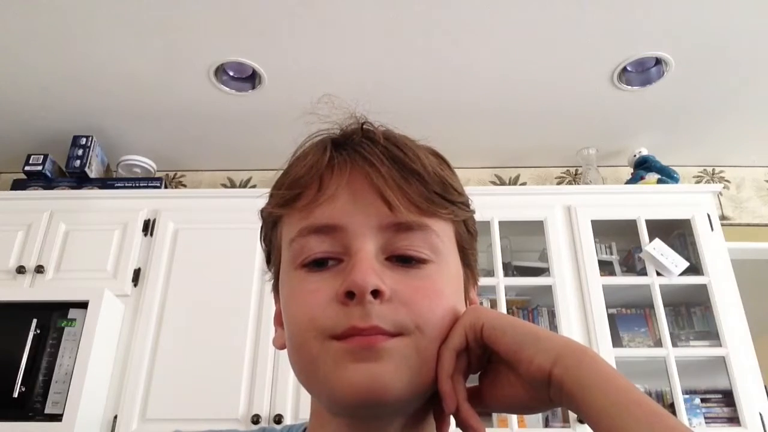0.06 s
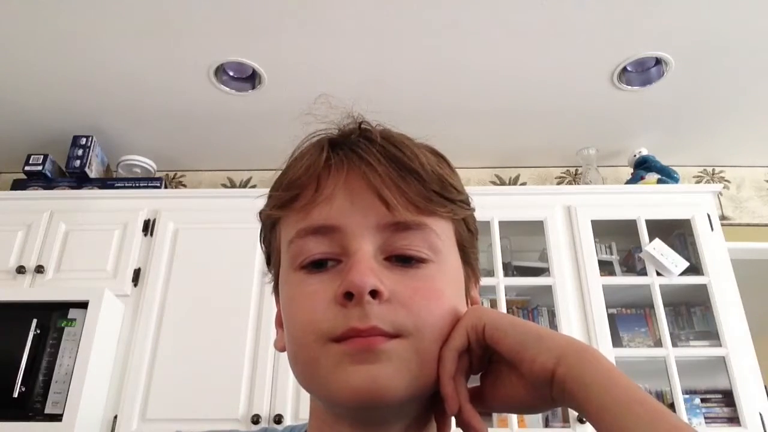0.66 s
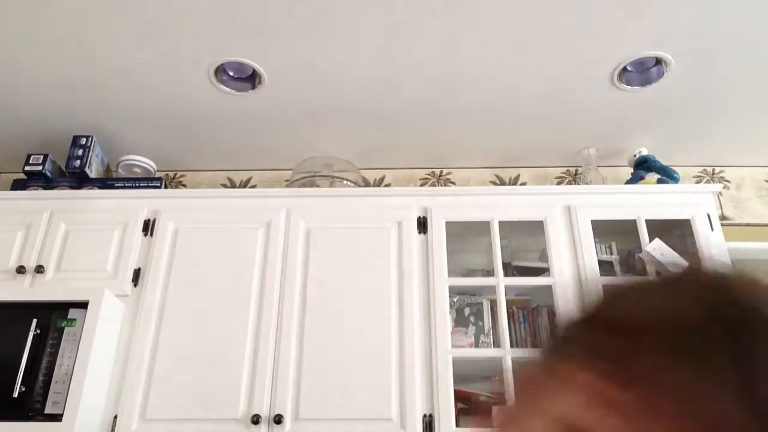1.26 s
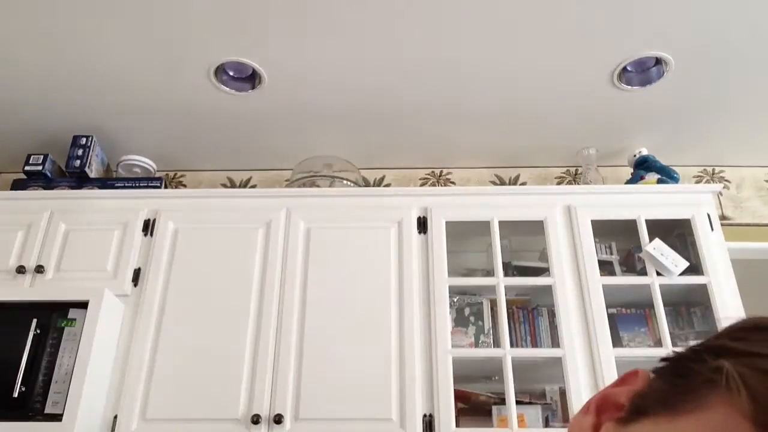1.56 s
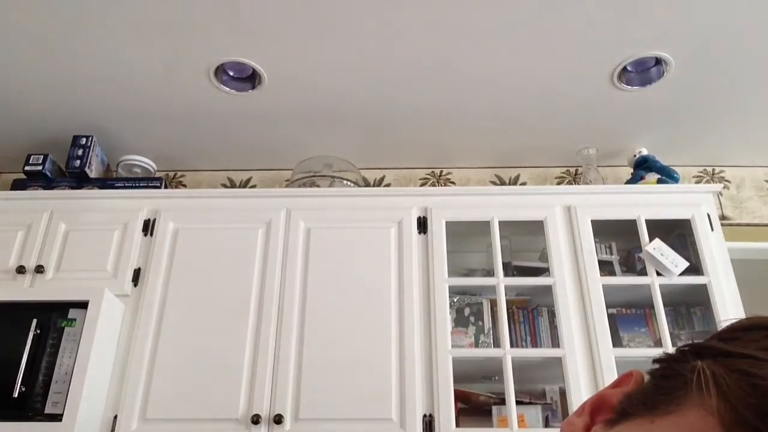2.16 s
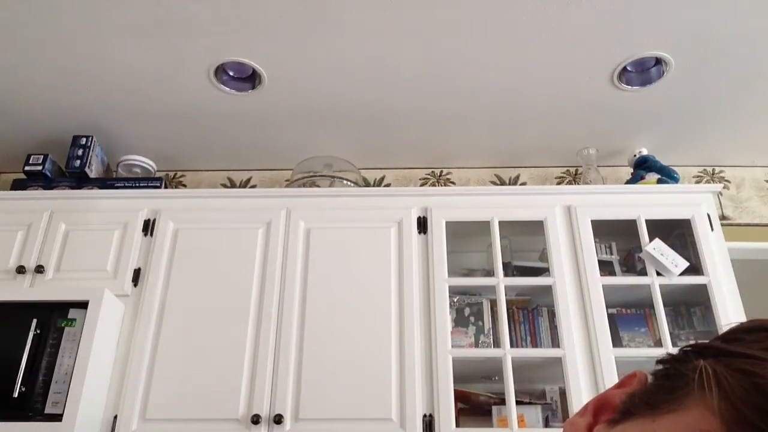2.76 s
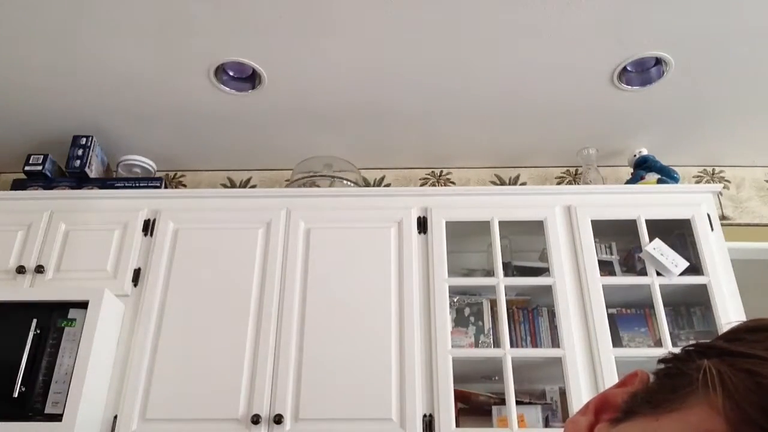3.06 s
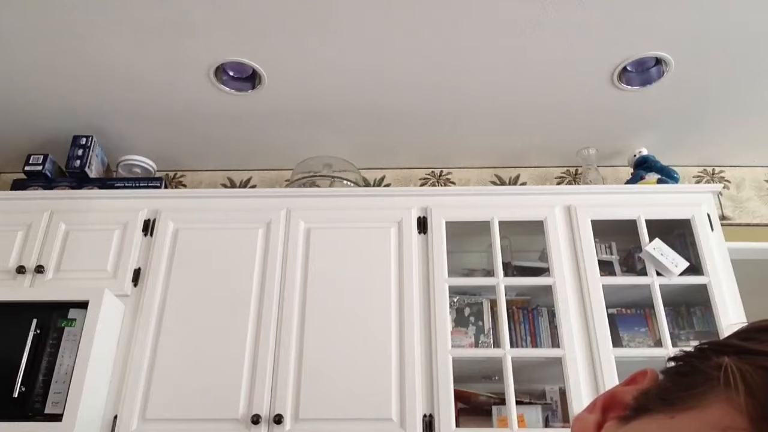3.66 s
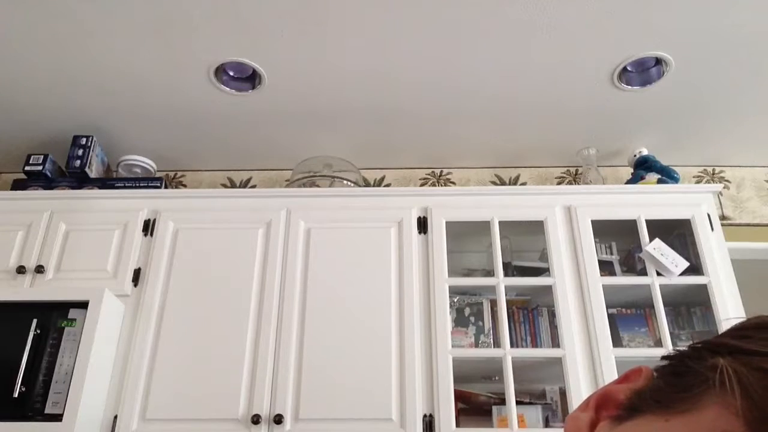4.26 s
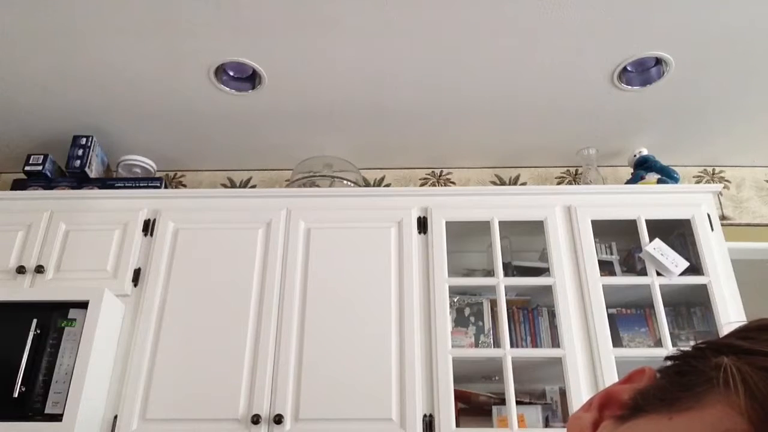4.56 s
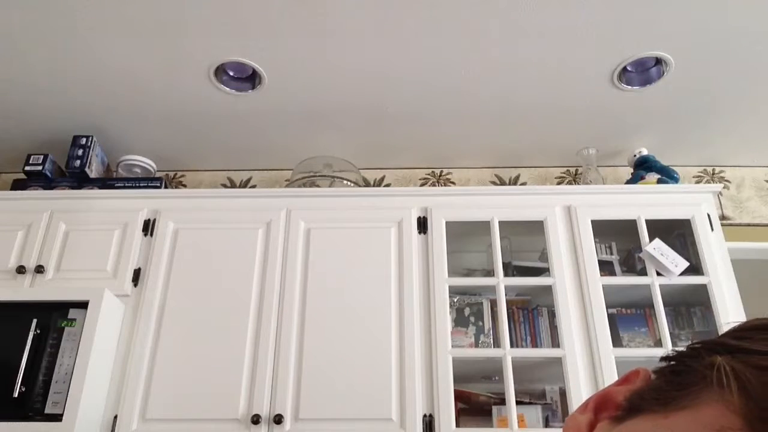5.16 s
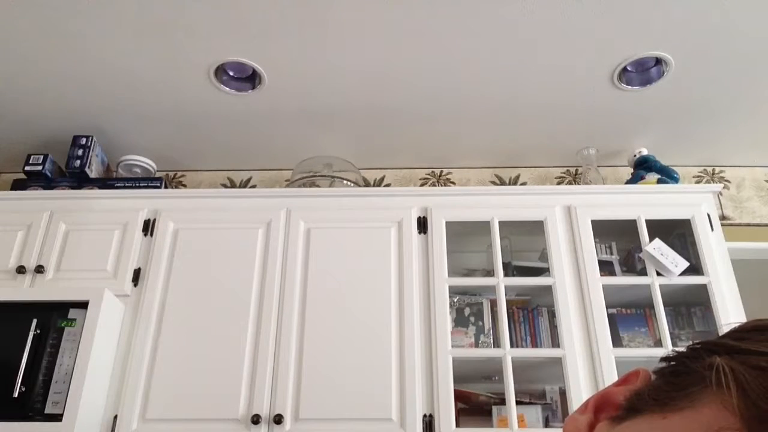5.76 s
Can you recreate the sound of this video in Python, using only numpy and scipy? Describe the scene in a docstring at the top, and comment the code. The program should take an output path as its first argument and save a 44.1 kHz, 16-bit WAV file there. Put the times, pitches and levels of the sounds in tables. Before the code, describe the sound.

A sharp, close thump on a table, small knocks and cloth rubs, then a chair falls and bounces loudly in a humming kitchen.

```python
"""A bare kitchen: a boy slumps onto the table, right beside a phone that stands on it.
The impacts of his arm, head and hand excite the damped modes of the top and of the phone's case,
and his sleeve rubs by stick-slip friction as he settles. Further off something hard, probably a
chair, topples and bounces; its frame rings and the room reverberates. An appliance hums throughout."""
import sys
import numpy as np
from scipy import signal
from scipy.fft import rfft, irfft
from scipy.io import wavfile

SR = 44100
rng = np.random.default_rng(int(sys.argv[2]) if len(sys.argv) > 2 else 0)


def master_out(mix):
    """Clip the mix to full scale and print it as 16-bit PCM to the path in sys.argv[1]."""
    frames = np.transpose(np.atleast_2d(mix))
    ceiling = np.clip(frames, -1, 1)
    pcm = np.round(ceiling * 32767).astype(np.int16)
    wavfile.write(sys.argv[1], SR, pcm)


N = 260631

# blows on the table: t/s, relative level/dB, bass/dB, treble/dB, clack of the case/dB
TABLE_BLOWS = [(1.138, -50.5, -10, -16, -16.5), (1.1765, -17, -6, -2.5, -23), (1.1863, -24.5, -3, 5.5, -34),
               (1.189, -30.5, 9, 10, -34), (1.2198, -23.5, -8, -9, -19), (1.298, -36, -6, -32, -28),
               (1.4379, -60.5, -14, 22, -35), (2.058, -53, -16.5, -4, -6), (2.0855, -39, -3.5, -4, -14),
               (2.1627, -34, -1, 13.5, -10), (2.3534, -45, -18, 8, -37), (2.3609, -24.5, -16.5, -2.5, -7.5),
               (2.431, -37.5, -2, 4, -22), (2.4706, -49, -18, 6, -3), (2.822, -59.5, -5, 6, -16),
               (2.9414, -47, -5, 8, -20), (2.956, -41, -25, 11, -22), (3.8096, -48, -10, 7.5, -26)]
# soft shifts of weight: t/s, relative level/dB
WEIGHT_SHIFTS = [(0.884, -48.5), (1.555, -50.5), (1.582, -56), (1.615, -53)]
# slides of the arm: t/s, duration/s, rub level/dB, brightness/dB, opening tap/dB
ARM_SLIDES = [(0.326, 0.025, -64, 0, -80), (0.801, .17, -74.5, 14, -80), (2.618, 0.15, -57.5, -2, -49),
              (2.924, 0.11, -53.5, 1, -57), (2.977, .15, -52.5, -5.5, -45), (3.18, 0.041, -51.5, -7, -52),
              (3.216, 0.075, -54.5, -7.5, -45.5), (3.3714, 0.046, -51, -9.5, -51),
              (3.452, 0.048, -50, -7, -46), (3.4924, 0.068, -51, -4.5, -45.5), (3.641, 0.057, -57, -7, -44),
              (3.765, .05, -52.5, -7.5, -63), (3.8408, 0.071, -49.5, -0.5, -43),
              (4.062, 0.14, -59, -6, -60), (4.3124, 0.1, -58.5, -23.5, -52.5),
              (4.442, 0.083, -61, -27, -74)]
# landings of the chair: t/s, lag between legs/s, first leg/dB, second leg/dB, frame/dB,
# weight on the first leg/dB, hardness of the legs/dB, slap of the frame/dB, second leg's f/Hz
CHAIR_LANDINGS = [(5.019, .0098, -25, -21, -27.5, 7, 7.5, 6, 2700),
                  (5.160, .02, -17.5, -25.5, -43, -10.5, -10, -5, 730),
                  (5.404, .0072, -21, -20, -32, -16, -7, 9.5, 2210),
                  (5.644, .0165, -20, -26.5, -26, -11, -16, -13.5, 1400),
                  (5.871, .01, -41, -49, -54, -6, -4.5, 10, 1490)]
# contacts of first leg, second leg and frame: rise time/s, frame ring/dB, direct crack/dB
CHAIR_CONTACTS = [(0.0033, -2, -4), (0.0043, -0.5, 3), (0.0048, 4, -11)]
# modes of table top, phone case, chair frame and soft thuds: f/Hz, relative level/dB, T60/s
TOP_MODES = [(171, -50, 0.56), (219, -10, .35), (278.6, -29, 0.99), (332, -62, 0.75), (360, 5, 0.3),
             (381.2, -7, 0.28), (452.5, 13, 0.16), (478, 6.5, 0.3), (668, -14.5, 0.83), (912, -17, 0.18),
             (1076, -8, 0.54)]
PHONE_MODES = [(829, -7, 0.14), (1584, 4, 0.032), (1880, -11, 0.067), (2280, -2, 0.055), (2640, -19, 0.046),
               (1132, -19, 0.33), (1494, -31, 1.36), (1640, -26, 0.59)]
FRAME_MODES = [(341.6, -9.5, 0.55), (371, -6, 0.46), (420.5, 1.5, 0.23), (459.6, 0, 0.49), (479, 1.5, 0.25),
               (573.4, -9, 0.63), (642, 4, 0.34), (667, -4.5, 0.68), (887, -10.5, 0.94), (1033, -6.5, 0.67),
               (1128, -17.5, 0.93), (1458, -16, 0.78), (1586, -12, 0.31), (1572, -4, 0.64),
               (2043, -9, 0.16), (2390, -14, 0.27), (2424, -14, 0.25), (2620, -7, 0.2), (3475, -24, 0.39),
               (3700, -17, 0.74), (3840, -9, 0.5), (3957, -20, 0.52), (4160, -17, 0.8), (4430, -25, 0.93),
               (5220, -26, 0.94), (6000, -28, 0.59)]
SHIFT_MODES = [(159, -6.5, 0.11), (226, 0, 0.076), (292, -27, 0.11), (378, -14.5, 0.1)]
# spectral densities of knock, crash, cloth, wall reflections and background: f/Hz, relative level/dB
KNOCK_SPECTRUM = [(70, -69), (120, -10), (200, -1.5), (420, 6), (800, -4.5), (1600, -11.5), (2700, -8),
                  (4000, -11), (6000, -14.5), (11000, -24.5), (16000, -22)]
CRASH_SPECTRUM = [(70, -48), (130, -20.5), (250, -1), (420, 1.5), (750, -1.5), (1200, -5.5), (1900, -2),
                  (2700, -5.5), (4000, -9), (6500, -10.5), (10000, -21), (16000, -30.5)]
CLOTH_SPECTRUM = [(70, -21), (250, -12.5), (450, -0.5), (800, -8.5), (1300, -10.5), (2200, -11.5),
                  (3000, -18.5), (4500, -13.5), (8000, -22.5), (16000, -27)]
WALL_SPECTRUM = [(70, -27), (200, -1.5), (500, -8), (1200, -7), (3000, -10), (6000, -14.5), (11000, -12),
                 (16000, -19)]
BACKGROUND_SPECTRUM = [(18, -85), (30, -74), (90, -46), (103, -16.5), (161, -6.5), (194, -8), (259, -7.5),
                       (328, -6.5), (526, -8), (569, -15), (684, -16.5), (988, -19), (2060, -28),
                       (13700, -33), (16000, -34.5)]
# tones of the appliance: f/Hz, level/dB
APPLIANCE_TONES = [(172, -72.5), (260, -66), (533, -67), (3741, -86.5)]
# reverberation time of the kitchen: f/Hz, T60/s
ROOM_T60 = [(100, 0.35), (500, 0.63), (2000, 0.65), (4000, 0.61), (7000, 0.54), (11000, 0.31),
            (16000, 0.26)]

BAND_HZ = 80 * 2 ** (np.arange(24) / 3)
BAND_FILTERS = [signal.butter(2, [f / 2 ** (1 / 6), f * 2 ** (1 / 6)], "bandpass", fs=SR, output="sos")
                for f in BAND_HZ]
BLOW_GAIN = np.sqrt(SR // 100)  # brings unit energy to that of 10 ms at rms 1
CONTACT_T60_S, CONTACT_HALVING_DB = 0.026, 15  # this much more treble halves a contact's decay time
TAP_BASS_DB, TAP_TREBLE_DB, TAP_CLACK_DB = -9, -4, -17.5  # a sleeved arm lands softly
FIRST_LEG_HZ, FRAME_HZ = 395, 580
SCRAPE_HZ, SCRAPE_BANDWIDTH_HZ, SCRAPE_LAG_S = 4300, 1100, 0.0028
REFLECTION_DELAY_S = 0.005


def table_impacts():
    """Impulse excitation: blows and taps ring top, case and room; harder contacts are briefer."""
    out = np.zeros(N)
    taps = [(s, tap_db, TAP_BASS_DB, TAP_TREBLE_DB, TAP_CLACK_DB) for s, *_, tap_db in ARM_SLIDES]
    for s, db, bass_db, treble_db, clack_db in TABLE_BLOWS + taps:
        t60 = CONTACT_T60_S * 2 ** (-treble_db / CONTACT_HALVING_DB)
        gains = band_shares(KNOCK_SPECTRUM) * undb(db + tilt(BAND_HZ, bass_db, treble_db)) * BLOW_GAIN
        crack = burst(gains, t60 * (2500 / BAND_HZ) ** 0.14, rise_s=0.00011)
        # the briefest contacts approach a single spike
        snap = undb(db + treble_db + 21) * np.exp(-t60 / 0.0057) * np.array([0.98, 0.91, 0.019, -0.47])
        thump = undb(db + bass_db - 4.5) * thud(hz=251, t60=0.04)
        case = undb(db + clack_db + 11) * ring(PHONE_MODES, rise_s=0.00072, scatter_db=0.5)
        # a heavier blow sets the top ringing more
        top = undb(db + 0.44 * bass_db - 2.5) * ring(TOP_MODES, rise_s=0.0039, scatter_db=3)
        for part in (crack, snap, thump, case, top):
            add(out, s, part)
        # part of a hard blow's extra treble never reaches the room
        wall_db = lookup(WALL_SPECTRUM, BAND_HZ) - 0.21 * tilt(BAND_HZ, 0, treble_db)
        tail = burst(gains * undb(wall_db), lookup(ROOM_T60, BAND_HZ), rise_s=0.00072)
        add(out, s + REFLECTION_DELAY_S, tail)
    return out


def thud(hz, t60):
    """Heavily damped oscillation of a soft mass stopped by the table."""
    t = np.arange(SR // 5) / SR
    swing = np.sin(2 * np.pi * hz * t) * decay(t, t60)
    return swing / np.linalg.norm(swing) * BLOW_GAIN


def bouncing_chair():
    """Repeated rebound: at each landing one leg, a second leg and then the frame strike the floor."""
    out = np.zeros(N)
    for s, lag_s, first_db, second_db, frame_db, weight_db, hard_db, slap_db, second_hz in CHAIR_LANDINGS:
        first = (s, first_db, weight_db, hard_db - 3.5, FIRST_LEG_HZ)  # a dull thump
        second = (s + lag_s, second_db, -13, hard_db, second_hz)  # carries little weight
        # a flat slap adds bass as well as treble
        frame = (s + 4.6 * lag_s, frame_db, 0.53 * slap_db - 3, slap_db, FRAME_HZ)
        for (onset_s, *blow), contact in zip((first, second, frame), CHAIR_CONTACTS):
            for part in floor_impact(*blow, *contact):
                add(out, onset_s, part)
    return out


def floor_impact(db, bass_db, treble_db, struck_hz, rise_s, ring_db, crack_db):
    """At a distance the reverberant field and the frame's modes outweigh the direct crack."""
    gains = band_shares(CRASH_SPECTRUM) * undb(db + tilt(BAND_HZ, bass_db, treble_db)) * BLOW_GAIN
    # the part that lands favours the bands and modes near its own pitch
    nearness = np.exp(-(np.log2(BAND_HZ / struck_hz) / 0.5) ** 2)
    modes = [(hz, mode_db - 8 * min(abs(np.log2(hz / struck_hz)), 1), t60)
             for hz, mode_db, t60 in FRAME_MODES]
    direct_db = crack_db + 0.098 * treble_db - 7.5 + 10.6 * nearness  # harder contacts crack more
    crack = burst(gains * undb(direct_db), np.full(len(BAND_HZ), 0.03), rise_s=0.00053)
    wash = burst(gains * undb(5.5 + 3.5 * nearness), lookup(ROOM_T60, BAND_HZ), rise_s)
    frame = undb(db + ring_db) * ring(modes, rise_s, scatter_db=2.74, detune=0.0081, far=True)
    return crack, wash, frame


def sleeve_rubs():
    """Sliding friction: cloth catches and slips in tiny grains, swelling and fading with each slide."""
    out = np.zeros(N)
    for s, duration_s, db, bright_db, _ in ARM_SLIDES:
        n = int(duration_s * SR)
        catches = np.repeat(rng.exponential(size=SR // 32), 32)[:n]
        grains = undb(3 * np.minimum(catches, 4.5)) * rng.standard_normal(SR)[:n]
        # a duller slide presses harder and has more bass
        cloth = colour(grains, CLOTH_SPECTRUM, bass_db=-0.63 * bright_db, treble_db=bright_db)
        add(out, s, undb(db) * cloth * np.sin(np.linspace(0, np.pi, n)))
    return out


def cuff_scrapes():
    """Stick-slip: as the cuff breaks loose, six uneven slips excite one small resonance."""
    out = np.zeros(N)
    t = np.arange(SR // 100) / SR
    for s, _, db, bright_db, _ in ARM_SLIDES:
        hz = SCRAPE_HZ * (1 + 0.059 * rng.standard_normal())
        resonance = np.sin(2 * np.pi * hz * t) * np.exp(-np.pi * SCRAPE_BANDWIDTH_HZ * t)
        slips, n = np.zeros(SR // 10), 0
        for gap, size in 0.5 + rng.random((6, 2)):
            slips[n] = size
            n += int(SR * 0.0023 * gap)
        scrape = np.convolve(slips, resonance)
        gain = undb(db + min(bright_db, 0)) * BLOW_GAIN
        add(out, s + SCRAPE_LAG_S, gain * scrape / np.linalg.norm(scrape))
    return out


def weight_shifts():
    """Soft loading excites only low modes: dull thuds as the body settles."""
    out = np.zeros(N)
    for s, db in WEIGHT_SHIFTS:
        add(out, s, undb(db + 10.5) * ring(SHIFT_MODES, rise_s=0.0063, scatter_db=2.5))
    return out


def reverberation(x):
    """Diffuse reflection: cupboards and ceiling return close sounds a few milliseconds later."""
    gains = undb(lookup(WALL_SPECTRUM, BAND_HZ)) * np.sqrt(BAND_HZ / SR / 2)
    response = np.zeros(N)
    add(response, REFLECTION_DELAY_S, burst(gains, lookup(ROOM_T60, BAND_HZ), rise_s=0.0034))
    return signal.fftconvolve(x, response[:SR])[:N]


def appliance():
    """Tones superposed on broadband noise: a hum wavering in phase, a low rush and faint hiss."""
    t = np.arange(N) / SR
    out = undb(-58) * colour(rng.standard_normal(N), BACKGROUND_SPECTRUM)
    for hz, db in APPLIANCE_TONES:
        drift = np.interp(t, np.linspace(0, t[-1], 30), rng.standard_normal(30))
        out += undb(db) * np.sqrt(2) * np.sin(2 * np.pi * hz * t + 0.63 * drift)
    return out


def ring(modes, rise_s, scatter_db, detune=0.00408, far=False):
    """Modal superposition: each mode is three close partials that beat; from afar, in any phase."""
    t = np.arange(SR * 3 // 4) / SR
    out = 0
    for hz, db, t60 in modes:
        partial_hz = hz * (1 + detune * rng.standard_normal((3, 1)))
        cycles = partial_hz * t + far * rng.random((3, 1))
        envelope = decay(t, t60)
        wave = np.sin(2 * np.pi * cycles).sum(0) * envelope
        wave *= np.linalg.norm(envelope) / np.linalg.norm(wave)
        out += undb(db + scatter_db * rng.standard_normal()) * wave
    return out * (1 - np.exp(-t / rise_s)) / np.linalg.norm(undb(np.array(modes)[:, 1]))


def burst(gains, t60s, rise_s):
    """Modal overlap: dense modes merge into noise bands of energy gain squared, each with its decay."""
    t = np.arange(int((max(t60s) + 0.05) * SR)) / SR
    out = 0
    for sos, gain, t60 in zip(BAND_FILTERS, gains, t60s):
        envelope = (1 - np.exp(-t / rise_s)) * decay(t, t60)
        band = signal.sosfilt(sos, rng.standard_normal(len(t)) * envelope)
        out += gain * band / np.linalg.norm(band)
    return out


def colour(x, spectrum, bass_db=0, treble_db=0):
    """Spectral shaping of noise, at rms 1 before bass and treble are changed."""
    hz = np.maximum(np.fft.rfftfreq(len(x), 1 / SR), 1)
    shaped = irfft(rfft(x) * undb(lookup(spectrum, hz)), len(x))
    shaped /= np.sqrt(np.mean(shaped ** 2))
    return irfft(rfft(shaped) * undb(tilt(hz, bass_db, treble_db)), len(x))


def tilt(hz, bass_db, treble_db):
    """Spectral tilt in dB: heavy contacts carry more bass, hard ones more treble."""
    bass = np.clip(np.log2(850 / hz) / 0.98, 0, 1)
    treble = np.clip(np.log2(hz / 1300) / 2.32, 0, 1.12)
    return bass_db * bass + treble_db * treble


def band_shares(spectrum):
    """Third-octave amplitudes of total power 1: band power is density times bandwidth."""
    gain = undb(lookup(spectrum, BAND_HZ)) * np.sqrt(BAND_HZ)
    return gain / np.linalg.norm(gain)


def lookup(table, hz):
    """Interpolation of (f/Hz, value) rows on a log-frequency axis."""
    f, value = np.transpose(table)
    return np.interp(np.log(np.maximum(hz, 1)), np.log(f), value)


def decay(t, t60):
    """Exponential damping, 60 dB in t60 seconds."""
    return np.exp(-np.log(1000) * t / t60)


def undb(db):
    """Amplitude ratio of a level in decibels."""
    return 10 ** (np.asarray(db) / 20)


def add(track, s, sound):
    """Superposition of a sound on the track at s seconds."""
    i = int(s * SR)
    track[i:i + len(sound)] += sound[:max(N - i, 0)]


def scene():
    """Linear superposition of the table sounds, their reverberation, the chair and the background."""
    settling = sleeve_rubs() + cuff_scrapes() + weight_shifts()
    return (table_impacts() + settling + reverberation(settling) + bouncing_chair() + appliance())[None]


def record(dry):
    """Band limiting: a high-pass removes the deep bass and a steep low-pass the highest treble."""
    thin = signal.sosfilt(signal.butter(4, 108, "highpass", fs=SR, output="sos"), dry)
    return signal.sosfilt(signal.ellip(10, 0.2, 70, 15450, fs=SR, output="sos"), thin)


dry = scene()
out = record(dry)
master_out(out)
```